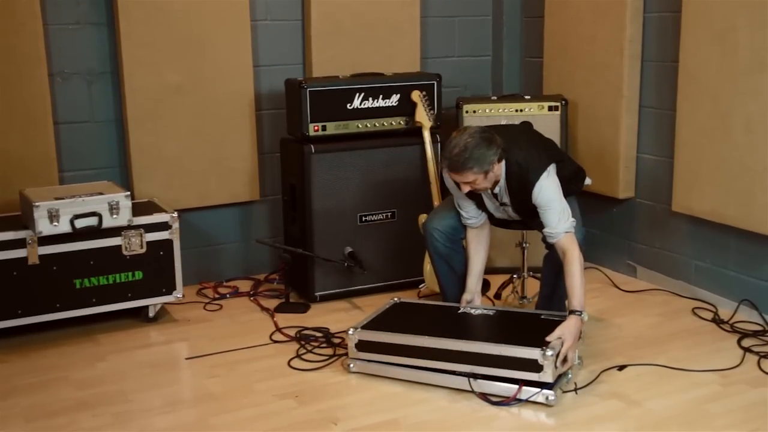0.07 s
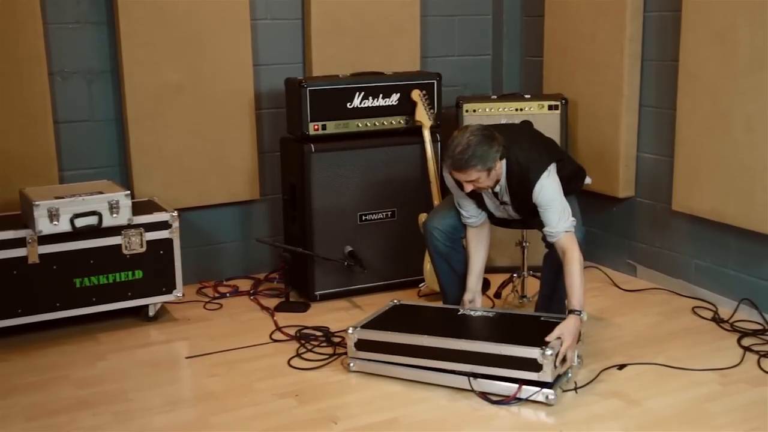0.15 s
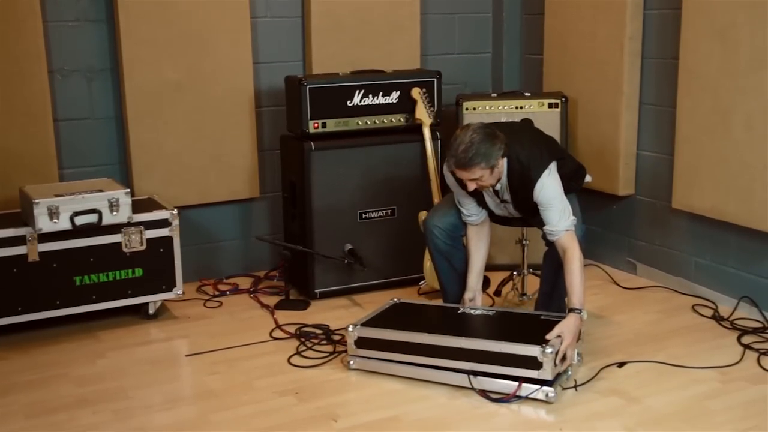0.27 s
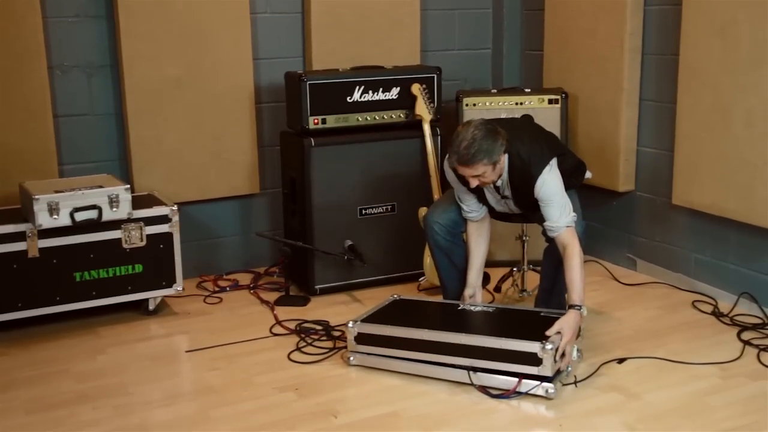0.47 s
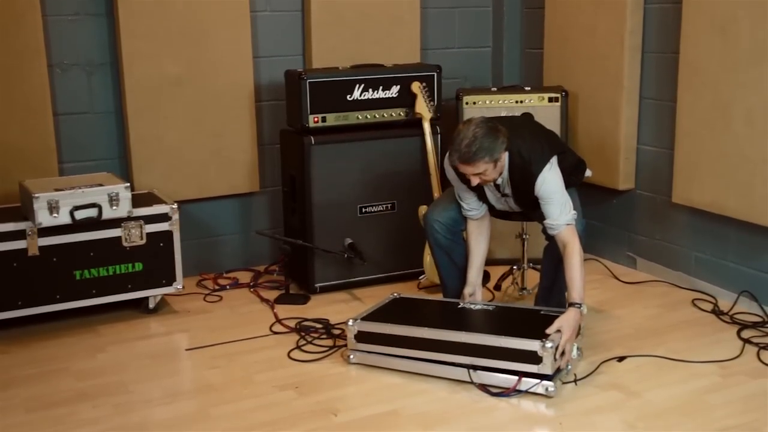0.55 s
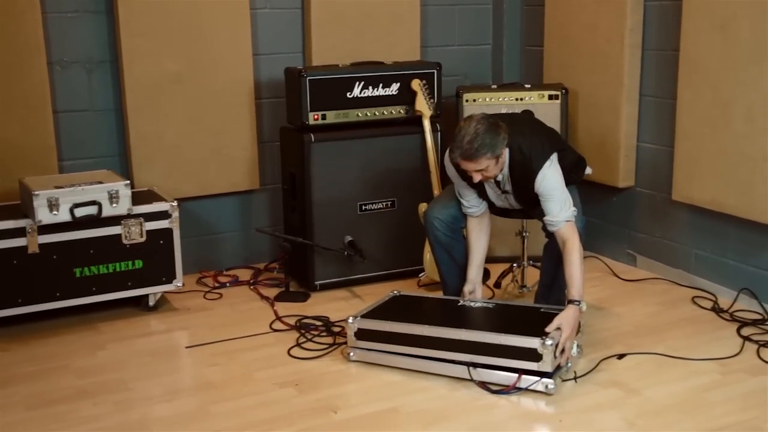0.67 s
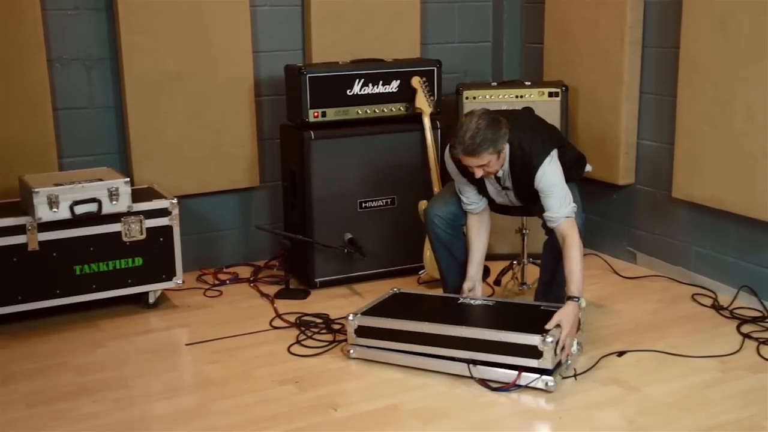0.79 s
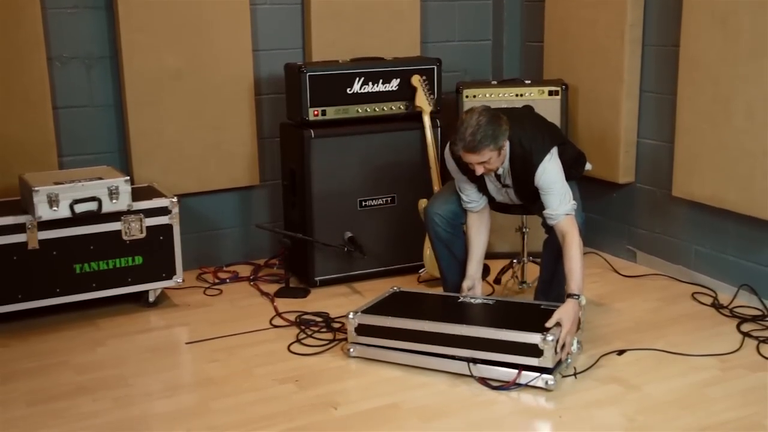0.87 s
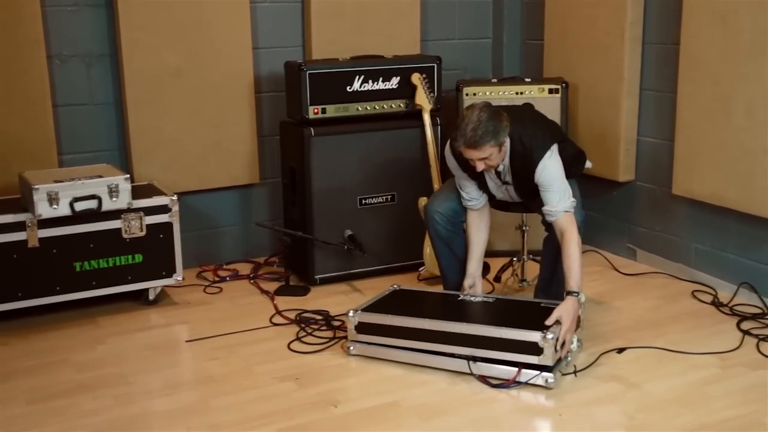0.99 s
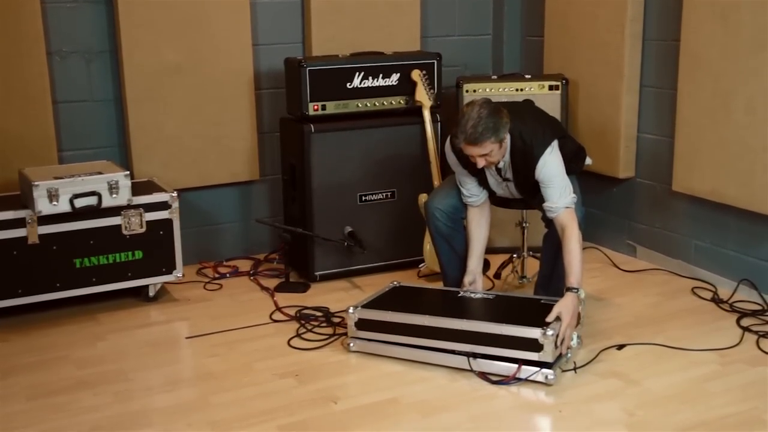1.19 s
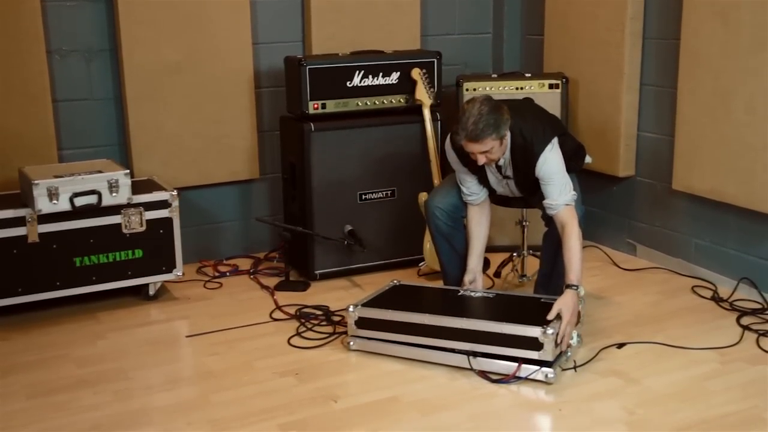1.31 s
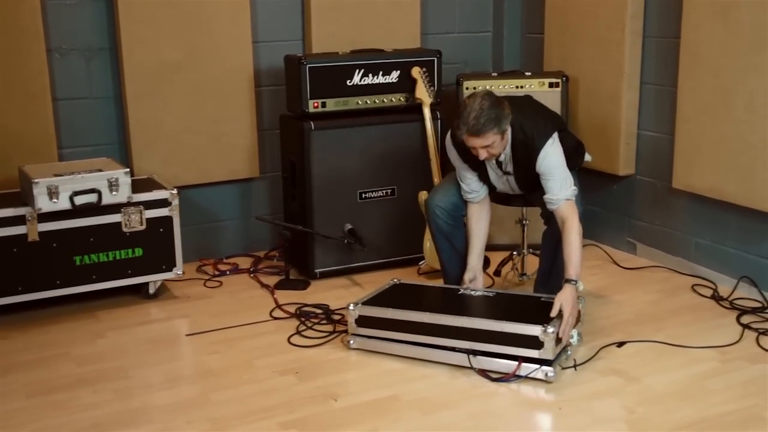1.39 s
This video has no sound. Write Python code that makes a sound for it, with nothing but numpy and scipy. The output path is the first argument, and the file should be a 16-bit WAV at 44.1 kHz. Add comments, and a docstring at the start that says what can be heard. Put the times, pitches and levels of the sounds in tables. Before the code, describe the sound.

Metal-edged plywood case handled on a wooden floor; the strongest knock and click come early, followed by near silence, then crisp edging snaps, dull thumps and brief scrapes, close and fairly dry, with little room echo.

```python
"""The lid of a plywood flight case with metal edging is eased into place on a wooden studio floor.
The edging ticks and snaps where its tongue meets the groove: rebounding touches ring metal modes.
The panels knock hollowly as pushes excite their modes, and rumble while random slips slide the lid.
A damped room answers briefly as decaying noise, over a faint hush of shaped steady noise; its
swelling tail after the snap at 1.16 s is played by the slips too."""
import sys
import numpy as np
from scipy import signal
from scipy.fft import rfft, irfft
from scipy.io import wavfile

SR = 44100
rng = np.random.default_rng(int(sys.argv[2]) if len(sys.argv) > 2 else 0)


def transcribe(signal):
    """Save signal, clipped to [-1, 1], as a 16-bit WAV file at the path in sys.argv[1]."""
    frames = np.atleast_2d(signal).T
    limited = np.clip(frames, -1, 1)
    pcm = np.round(limited * 32767).astype(np.int16)
    wavfile.write(sys.argv[1], SR, pcm)


N = 63945  # length in samples

# Modes of the metal edging. Each row: frequency in Hz, relative level in dB,
# unscaled decay time t60 in seconds.
EDGING_MODES = [(1163,-8,0.021),(1810,2,0.0071),(2388,-2.5,0.01),(2924,-2,.015),(3530,-4.5,0.018),(4090,0,0.017),(4403,1,.012),(4986,-2,0.0086),
                (5540,-7,0.018),(6060,-3.5,0.0082),(7160,-8.5,0.01),(7740,-6.5,0.0094),(8370,-10,0.0064),(9380,-9.5,0.00492)]
# Modes of the hollow case. Each row: frequency in Hz, relative level in dB,
# unscaled decay time t60 in seconds.
PANEL_MODES = [(32.8,-15,0.11),(92.3,-2,0.058),(153,-51,0.033),(177.4,-27.5,0.28),(224,0,0.055),(276.3,-4.5,0.09),(391,5,0.067),(544.5,-0.5,0.049),(616,1,0.031),(708,-3.5,0.056),(916,5,0.013),(1070,-29.5,.03)]

BOOM_HZ, HOLLOW_HZ = 130, 320  # upper limits of the deep boom and of the hollow middle
LOW_RING_HZ, TOP_HZ = 3200, 5200  # the metal's low ring lies below, its top above
FAVOUR_OCTAVES = 0.11  # standard deviation of the favoured pitch region

# Sliding
GRAINS_PER_S, GRAIN_SPREAD_DB = 5300, 2  # mean slip rate; scale of the exponential spread in size
RUB_CUT_HZ, RUMBLE_CUT_HZ = 8300, 900  # rubbing is duller than a blow
RUB_T60_SHARE, RUB_HZ, RUB_FAVOUR_DB = 0.4, 4590, 2.5  # held metal rings shorter, near one pitch
RUMBLE_T60_SHARE = 1.2

# Blows
STRIKE_OFFSET_DB = -6.5  # common to touches and knocks
BOOM_SWELL_T60_S = 0.15  # the air in the case takes up the blow slowly
REBOUNDS, REBOUND_GAP_S = 3, 0.0013  # nominal gap, varied at random
REBOUND_DB, REBOUND_DULL_DB_PER_KHZ = -1, -0.2336  # change at each rebound, ever duller
LIGHT_TOUCH_LOSS, HARD_BLOW_DB = 0.051, -30  # extra rebound loss, dB per dB under a hard blow
STRIKE_SPREAD_DB = 1  # standard deviation of each mode's strength
SCATTER_T60_SHARE = 0.32  # reflections blur the ring of the metal

# Room, hush and microphone
ROOM_T60_S, ROOM_GAP_S, ROOM_RISE_S, ROOM_DB = 0.2, 0.0017, 0.004, -7.5
TREBLE_T60_S, TREBLE_HZ, WALL_CUT_HZ = 0.13, 5500, 18300  # the room's treble dies sooner
PANEL_ROOM_DB = -4  # the padded walls return less of the knocks
HUSH_DB = -70.5  # rms level
MIC_ROLL_HZ, CUTOFF_HZ = 11340, 16000


def amp(db):
    """Amplitude ratio of a level: 20 dB is a factor of ten."""
    return 10 ** (np.asarray(db) / 20)


def rms_one(x):
    """Normalisation of the mean power to one."""
    return x / np.sqrt(np.mean(x ** 2) + 1e-20)


def ring(x, hz, t60):
    """Damped resonance: a unit click sets off a decaying sine of initial envelope 1."""
    radius = amp(-60 / (max(t60, 0.002) * SR))
    w = 2 * np.pi * hz / SR
    tiny = 1e-18  # keeps the filter away from denormal numbers
    return signal.lfilter([0, np.sin(w)], [1, -2 * radius * np.cos(w), radius * radius], x + tiny)


def soften(x, hz):
    """First-order relaxation applied twice: two one-pole low-passes."""
    r = np.exp(-2 * np.pi * hz / SR)
    return signal.lfilter([(1 - r) ** 2], [1, -2 * r, r * r], x)


def favour(hz, spot_hz, db):
    """Modal coupling: gain in dB that a struck spot lends to a mode near its own pitch."""
    octaves = np.log2(hz / spot_hz)
    return db * np.exp(-0.5 * (octaves / FAVOUR_OCTAVES) ** 2)


def hush():
    """Stationary noise of room and microphone: white noise weighted by a spectral envelope."""
    # Spectral envelope. Each row: frequency in Hz, relative level in dB.
    envelope = [(12, -47), (20, -2.5), (60, -6.5), (93, -8.5), (146, -15), (227, -20), (336, -21.5),
                (425, -27), (1060, -36.5), (1570, -38), (2150, -42), (3810, -40), (10300, -46),
                (13400, -40.5), (22000, -120)]
    hz, db = np.transpose(envelope)
    grid = np.fft.rfftfreq(N, 1 / SR) + 1  # avoids the logarithm of zero
    gain = amp(np.interp(np.log(grid), np.log(hz), db))
    noise = irfft(rfft(rng.standard_normal(N)) * gain, N)
    return amp(HUSH_DB) * rms_one(noise)


def grit():
    """Stick-slip friction as dense random impulses of uneven size and either sign."""
    sizes_db = GRAIN_SPREAD_DB * np.minimum(rng.exponential(1, N), 5)
    sizes = amp(sizes_db) * rng.choice([-1, 1], N)
    return sizes * (rng.random(N) < GRAINS_PER_S / SR)


def sliding():
    """Friction excitation of resonators: slips along the rim excite the metal and the panels."""
    # Course of the rubbing and rumble, with the room's swelling tail after the snap at 1.16 s.
    # Each row: time in seconds, rms level of the metal part in dB, rms level of the upper
    # panel modes in dB, boom and hollow middle against those modes in dB.
    rub_and_rumble = [(0,-60.5,-45,-10.5),(0.028,-84.5,-79,10.5),(0.102,-74.5,-68,-5),(0.137,-73,-65.5,10.5),(0.202,-58,-47,3),(0.239,-50,-45,8),(.29,-66,-52,-6),(0.319,-80,-62.5,-1),(0.333,-106,-79.5,7),(.38,-86,-83,7),(0.452,-91.5,-96.5,12.5),(0.542,-86,-76,1),(0.599,-86,-76,2.5),(.63,-79,-74.5,-3),
                      (.67,-79,-75,2),(0.772,-81,-72.5,0.5),(0.822,-56,-55.5,7),(0.858,-57,-45,2),(0.883,-62.5,-54,-3),(0.926,-65,-51.5,-1),(0.948,-73.5,-71.5,4),(1.052,-67.5,-65,2.5),(1.09,-85,-84,-14),(1.151,-69.5,-63.5,-21),(1.168,-63,-53,-10),(1.199,-56.5,-53,-6.5),
                      (1.224,-69.5,-75,4.5),(1.28,-88.5,-96,3),(1.336,-80.5,-71.5,1.5),(1.383,-75.5,-72,-3.5),(1.409,-70.5,-60.5,-4),(1.45,-62.5,-54.5,-6)]
    s, *columns = np.transpose(rub_and_rumble)
    t = np.arange(N) / SR
    metal_db, panel_db, deep_db = [np.interp(t, s, column) for column in columns]

    slips = soften(grit(), RUB_CUT_HZ)
    metal = np.zeros(N)
    for k, (hz, db, t60) in enumerate(EDGING_MODES):
        gain = (-1) ** k * amp(db + favour(hz, RUB_HZ, RUB_FAVOUR_DB))
        metal += gain * ring(slips, hz, RUB_T60_SHARE * t60)

    slips = soften(grit(), RUMBLE_CUT_HZ)
    low, high = np.zeros(N), np.zeros(N)
    for k, (hz, db, t60) in enumerate(PANEL_MODES):
        part = low if hz < HOLLOW_HZ else high
        part += (-1) ** k * amp(db) * ring(slips, hz, RUMBLE_T60_SHARE * t60)
    rumble = rms_one(high) + amp(deep_db) * rms_one(low)
    return amp(metal_db) * rms_one(metal) + amp(panel_db) * rumble


def knocks():
    """Impact on a modal body: rounded pushes, shorter when harder; the deepest modes swell in."""
    # Blows on the panels. Each row: start in seconds, level in dB, hardness as low-pass in Hz,
    # deep boom against it in dB, hollow middle against it in dB,
    # pitch that the spot favours in Hz, by how much in dB.
    blows = [(.001,-43,387,8.5,1.5,412,-8),(0.137,-40,290,8,-13.5,290,24),(0.2066,-27,930,-21,6,283,7.5),(0.2156,-19,673,-2.5,2.5,220,2.5),(.248,-36,940,9.5,2,626,4.5),(0.284,-49,1180,4,11,860,0.5),(0.503,-73.5,202,6,-15,34.8,26.5),
             (0.616,-69,900,-11,-16,395,1),(0.625,-52.5,1570,-14,-17,1007,17),(0.795,-38.5,1260,-9,-2.5,525,9),(0.834,-36.5,486,2.5,-14,403,4.5),(.853,-37.5,513,0,6.5,395,-9),(0.902,-41,486,3.5,-1.5,397,4.5),(.982,-47,310,7.5,-9,181,1),(1.021,-52,1200,-6,1,531,11),
             (1.120,-52.5,1220,-23,5,550,7.5),(1.160,-41,1290,0.5,-12,680,8),(1.326,-59.5,890,-12,-18,572,13.5),(1.405,-56,600,10.5,-4,380,3),(1.44,-56,1160,15.5,-14,395,4.5)]
    click = np.zeros(2000)
    click[0] = 1
    out = np.zeros(N)
    for k, (hz, mode_db, t60) in enumerate(PANEL_MODES):
        force = np.zeros(N + len(click))
        for s, db, hard_hz, boom_db, hollow_db, spot_hz, spot_db in blows:
            part_db = boom_db if hz < BOOM_HZ else hollow_db if hz < HOLLOW_HZ else 0
            size = amp(db + STRIKE_OFFSET_DB + part_db + favour(hz, spot_hz, spot_db))
            force[int(s * SR):][:len(click)] -= size * soften(click, hard_hz)
        if hz < BOOM_HZ:
            force = ring(force, hz, BOOM_SWELL_T60_S) * 30 / (BOOM_SWELL_T60_S * SR)
        out += (-1) ** k * amp(mode_db) * ring(force[:N], hz, t60)
    return out


def room(x):
    """Diffuse reverberation: noise that starts after a gap, swells and dies, the treble first."""
    t = np.arange(SR // 2) / SR
    late = np.maximum(t - ROOM_GAP_S, 0)
    noise = soften(rng.standard_normal(len(t)), WALL_CUT_HZ)
    low = signal.sosfilt(signal.butter(2, TREBLE_HZ, fs=SR, output="sos"), noise)
    high = signal.sosfilt(signal.butter(2, TREBLE_HZ, "high", fs=SR, output="sos"), noise)
    decaying = low * amp(-60 * late / ROOM_T60_S) - high * amp(-60 * late / TREBLE_T60_S)
    echo = (1 - np.exp(-late / ROOM_RISE_S)) * decaying
    echo /= np.sqrt(np.sum(echo ** 2))  # unit energy
    return amp(ROOM_DB) * signal.fftconvolve(x, echo)[:N]


def edging():
    """Repeated impact on metal modes: touches rebound; returns the direct and the blurred ring."""
    # Touches of the edging. Each row: start in seconds, level in dB, low ring against it in dB,
    # top against it in dB, pitch that the spot favours in Hz, by how much in dB.
    touches = [(0.088,-62.5,4,5,5260,13.5),(0.1143,-61.5,-6,-1,1690,15.5),(.1436,-63,-5,0,4500,9),(0.182,-56,-8,-15,4730,11),(0.2076,-43,6.5,-22,1860,5),(0.217,-28,-3,-1.5,4820,7),
               (0.2484,-45.5,1,-3,4410,5),(0.2678,-44,-2,-10,9300,14),(0.283,-36,-4,3.5,1780,8),
               (.299,-50.5,5,-4,2600,21),(0.307,-49,-9,-17,2900,5.5),(0.3125,-48,-25,-10,2460,21),(0.322,-71,-4,-8,3600,10),(.582,-70.5,-3.5,-12,4220,-10),(0.6067,-48,-6.5,-8,1780,5.5),
               (0.6152,-52.5,0.5,-1.5,4300,11),(0.623,-57.5,6.5,-2,1260,24),(.671,-64,-22,-13,4330,5),
               (.6968,-68,-3,6.5,6200,5),(0.7118,-71,-2,7,6200,9),(.723,-61.5,-8.5,0,1710,18),(.7362,-64.5,3,6,6350,14),(.7829,-57,-27,-0.5,5920,20.5),(0.7937,-29,-4,2,8600,6),(0.9647,-52,1.5,-6,4170,0.5),(.979,-58,-1,-3,4450,6),
               (1.0207,-35.5,-11.5,-2.5,1780,10),(1.1195,-47,-1.5,-4.5,4240,1.5),(1.1462,-57,1,-11,1790,3),(1.1599,-29,-7.5,3,2755,10),(1.3926,-73.5,-13,12.5,8000,6),(1.4373,-64,8,9,1720,17)]
    spread = rng.standard_normal((len(touches), len(EDGING_MODES)))
    gaps = REBOUND_GAP_S * rng.uniform(0.76, 1.3, (len(touches), REBOUNDS))
    lags = np.cumsum(gaps, axis=1)
    s, db, low_db, top_db, spot_hz, spot_db = np.transpose(touches)
    touch_loss_db = LIGHT_TOUCH_LOSS * (db - HARD_BLOW_DB)
    direct, blurred = np.zeros(N), np.zeros(N)
    for k, (hz, mode_db, t60) in enumerate(EDGING_MODES):
        colour_db = low_db if hz < LOW_RING_HZ else top_db if hz > TOP_HZ else 0
        spot_gain_db = favour(hz, spot_hz, spot_db)
        size = amp(db + colour_db + spot_gain_db + STRIKE_SPREAD_DB * spread[:, k])
        rebound_db = REBOUND_DB + touch_loss_db + REBOUND_DULL_DB_PER_KHZ * hz / 1000
        force = np.zeros(N + SR)  # room for late rebounds
        for count, lag in enumerate([0, *lags.T]):
            force[((s + lag) * SR).astype(int)] += size * amp(count * rebound_db)
        gain = (-1) ** k * amp(mode_db + STRIKE_OFFSET_DB)
        direct += gain * ring(force[:N], hz, t60)
        blurred += gain * ring(force[:N], hz, SCATTER_T60_SHARE * t60)
    return direct, blurred


def scene():
    """Superposition of the direct hits, their room, the rubbing and rumble, and the hush."""
    metal, blurred = edging()
    wood = knocks()
    echo = room(blurred + amp(PANEL_ROOM_DB) * wood)
    mix = metal + wood + echo + sliding() + hush()
    return mix[None]  # one channel


def record(dry):
    """Band limitation: the microphone rolls off the treble and a steep low-pass cuts the top."""
    dull = signal.sosfilt(signal.butter(4, MIC_ROLL_HZ, fs=SR, output="sos"), dry)
    return signal.sosfilt(signal.cheby2(12, 70, CUTOFF_HZ, fs=SR, output="sos"), dull)


dry = scene()
out = record(dry)
transcribe(out)
```